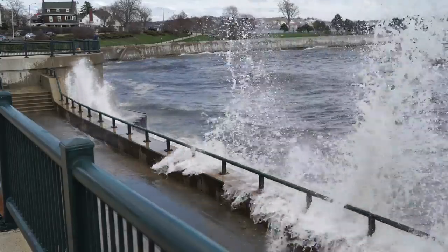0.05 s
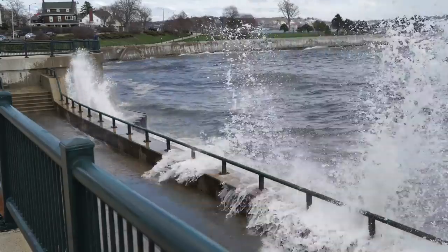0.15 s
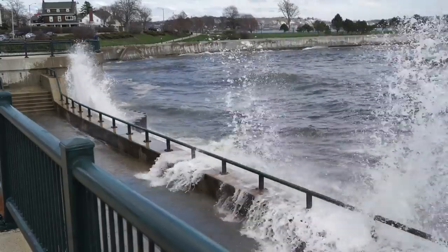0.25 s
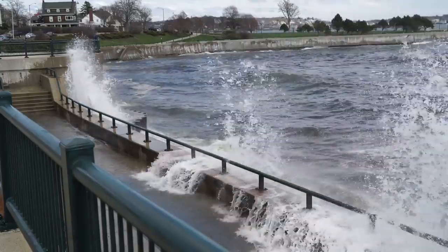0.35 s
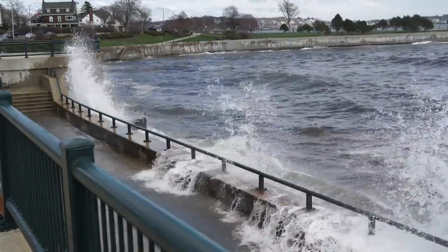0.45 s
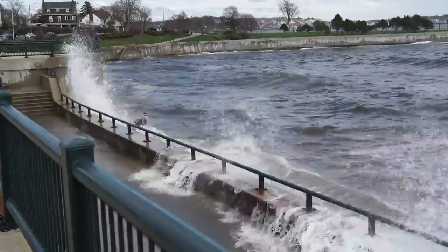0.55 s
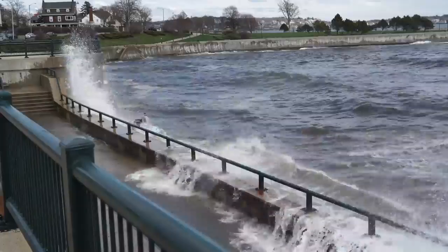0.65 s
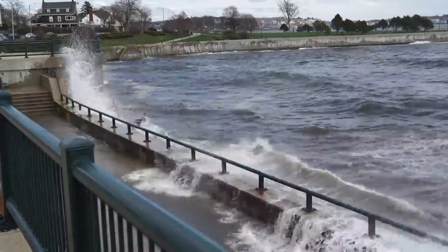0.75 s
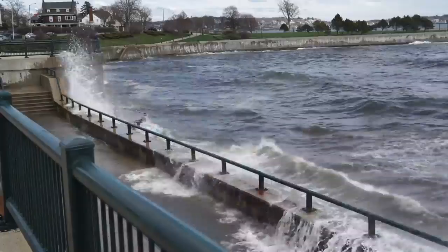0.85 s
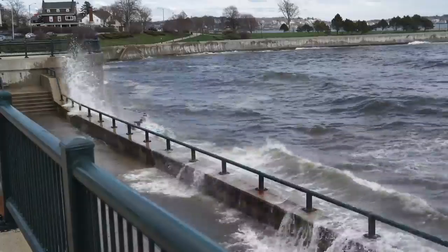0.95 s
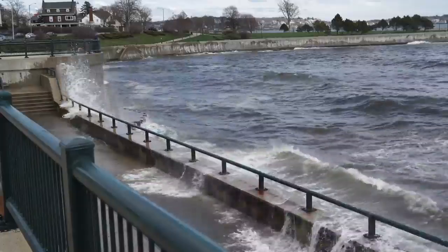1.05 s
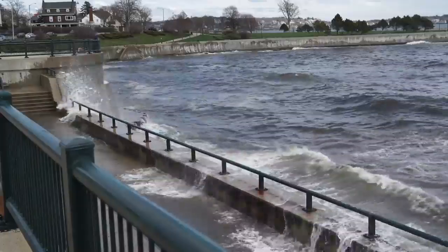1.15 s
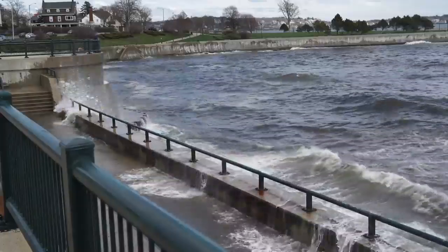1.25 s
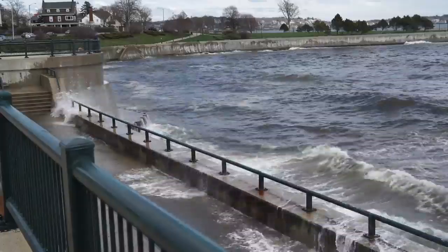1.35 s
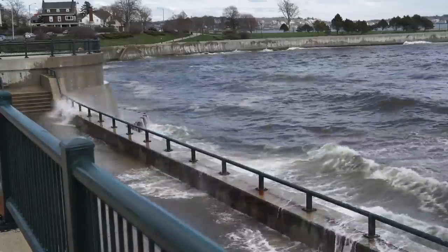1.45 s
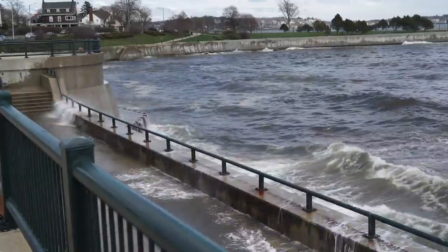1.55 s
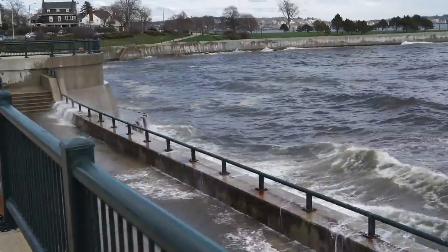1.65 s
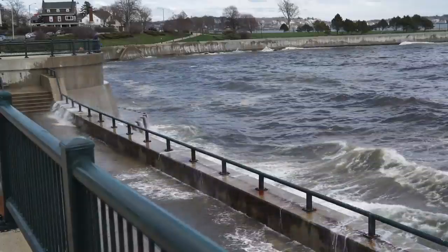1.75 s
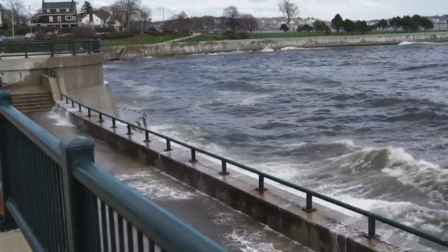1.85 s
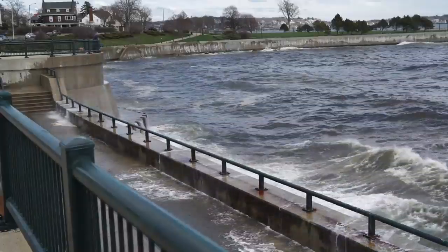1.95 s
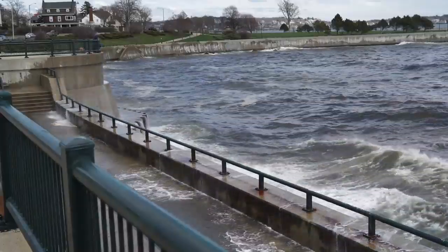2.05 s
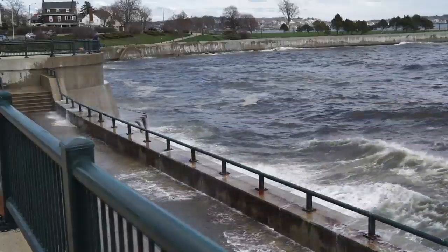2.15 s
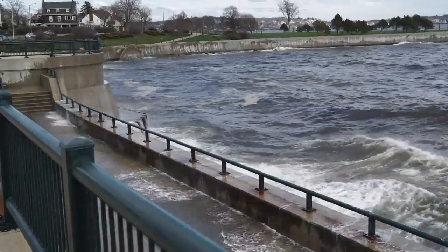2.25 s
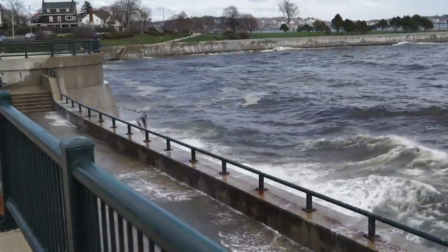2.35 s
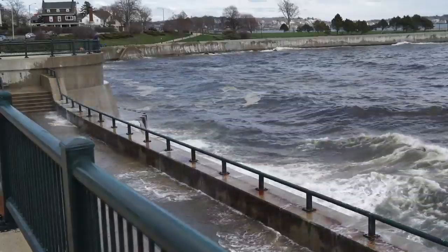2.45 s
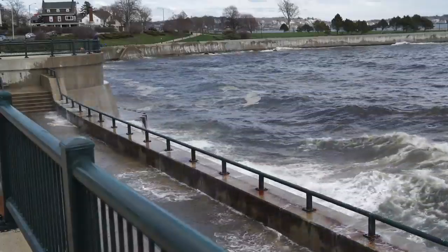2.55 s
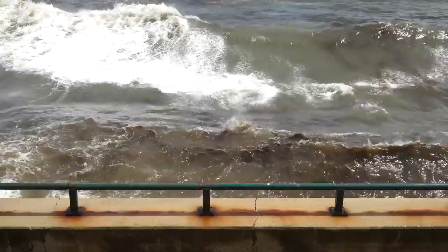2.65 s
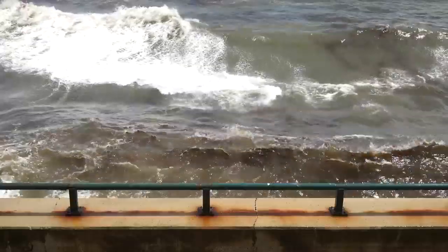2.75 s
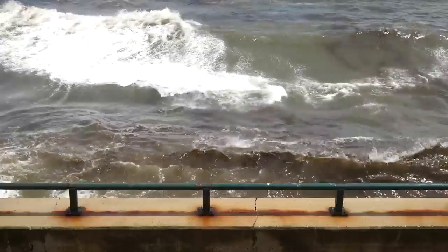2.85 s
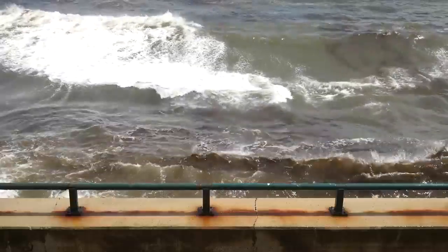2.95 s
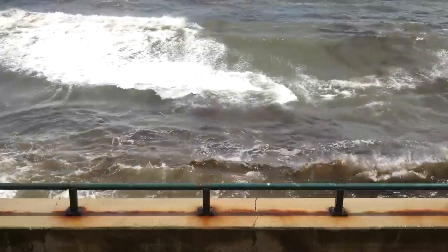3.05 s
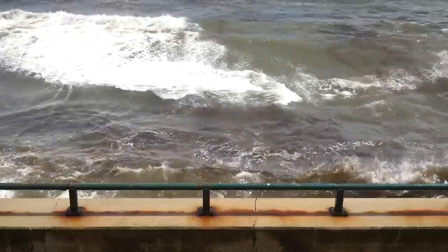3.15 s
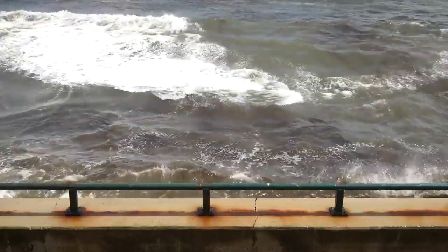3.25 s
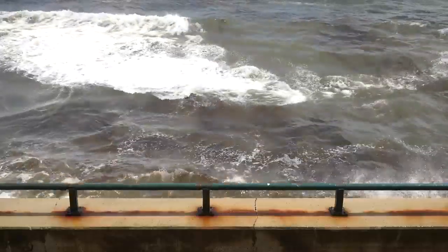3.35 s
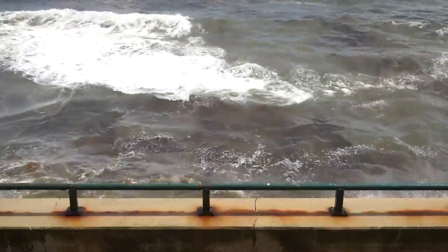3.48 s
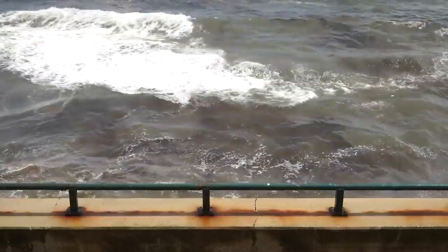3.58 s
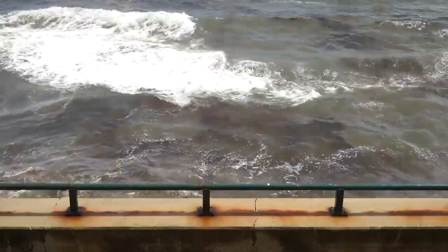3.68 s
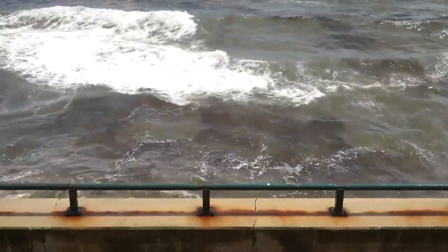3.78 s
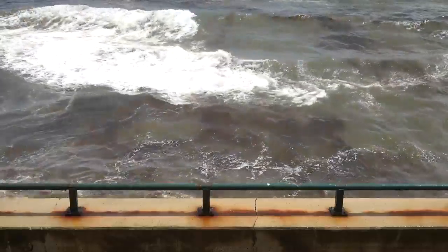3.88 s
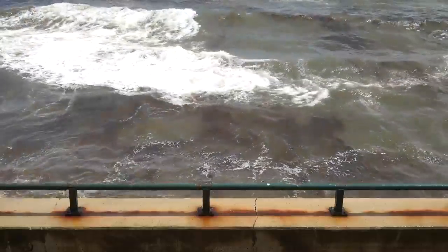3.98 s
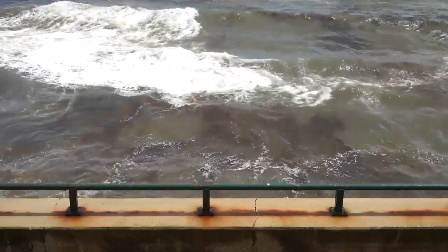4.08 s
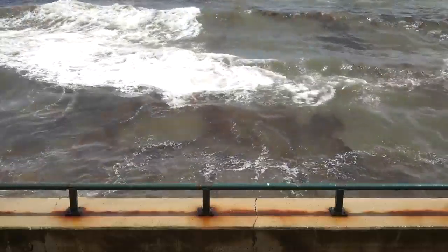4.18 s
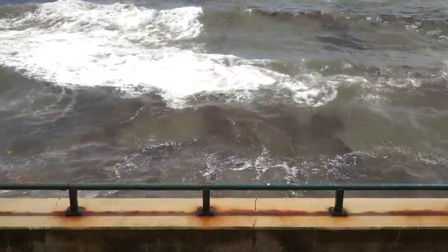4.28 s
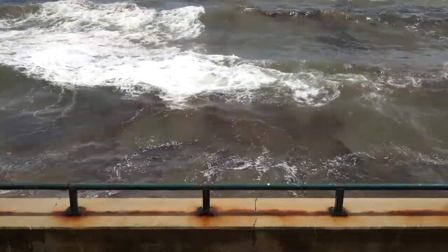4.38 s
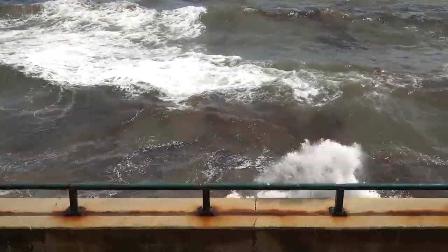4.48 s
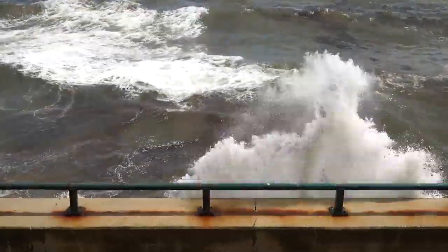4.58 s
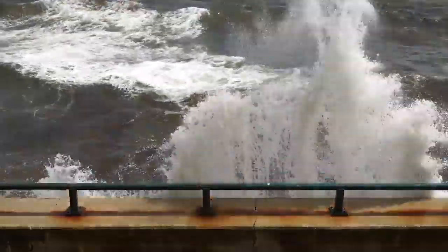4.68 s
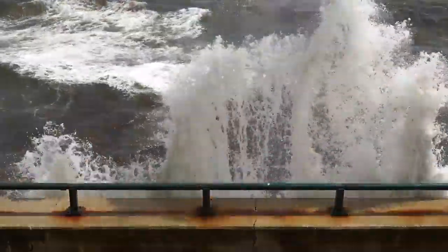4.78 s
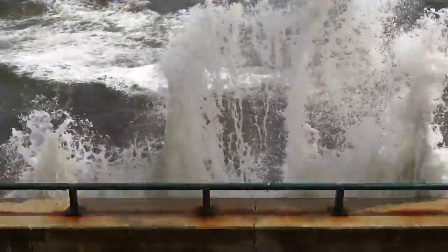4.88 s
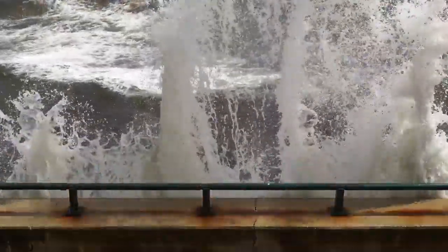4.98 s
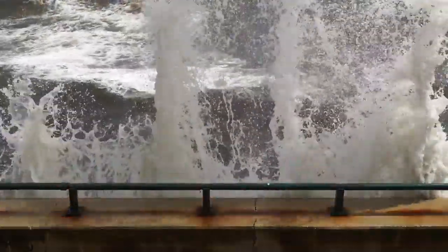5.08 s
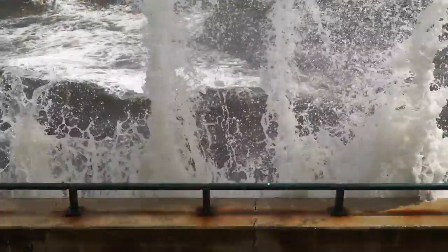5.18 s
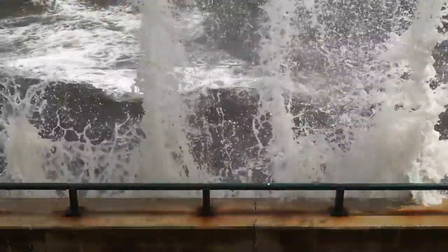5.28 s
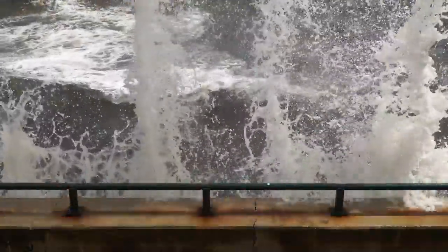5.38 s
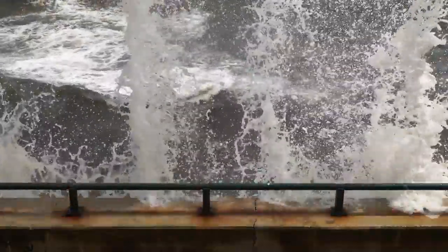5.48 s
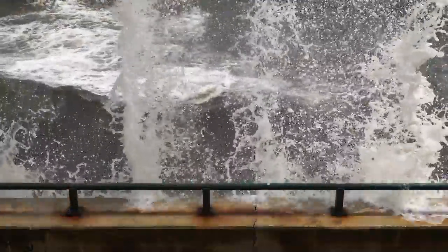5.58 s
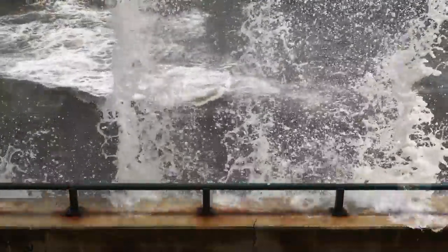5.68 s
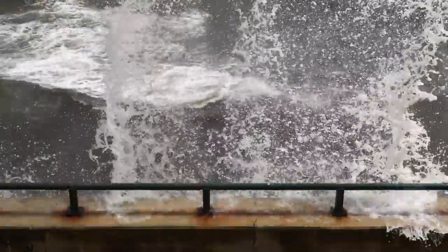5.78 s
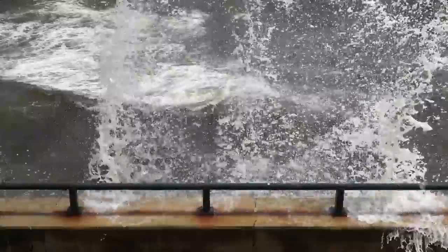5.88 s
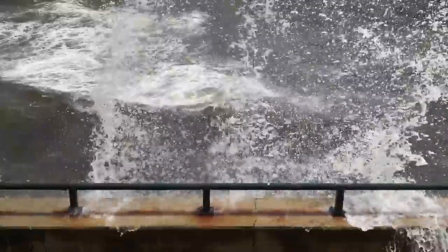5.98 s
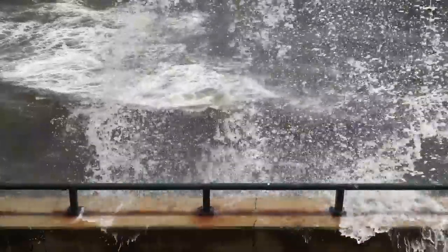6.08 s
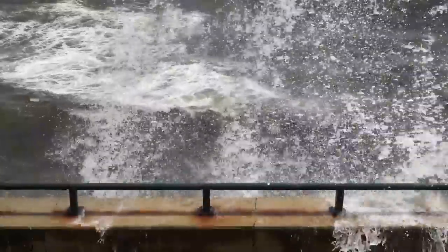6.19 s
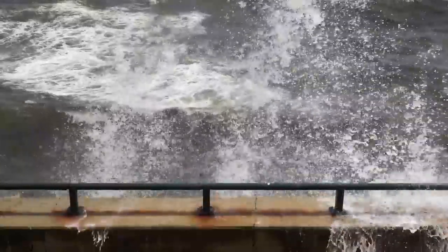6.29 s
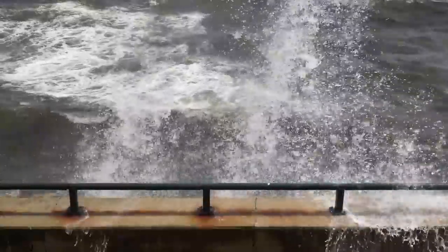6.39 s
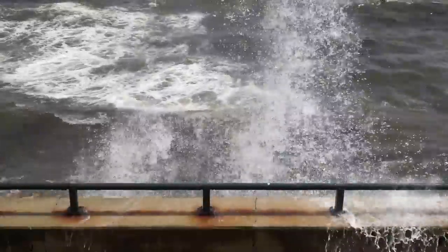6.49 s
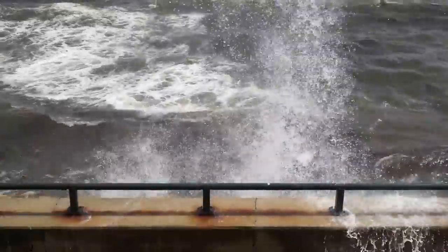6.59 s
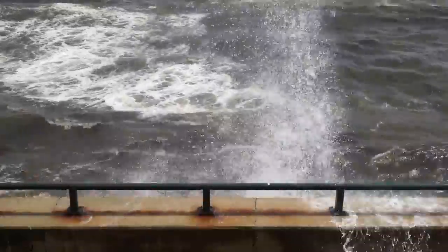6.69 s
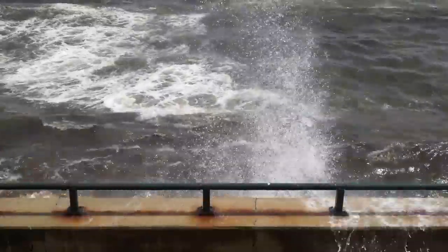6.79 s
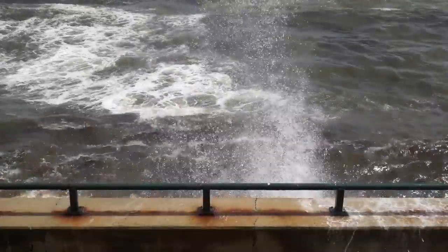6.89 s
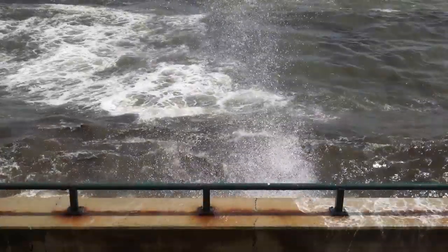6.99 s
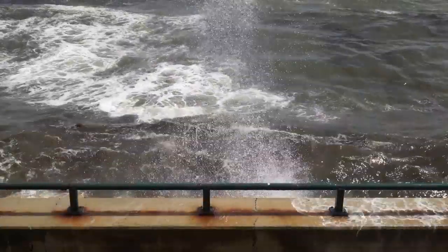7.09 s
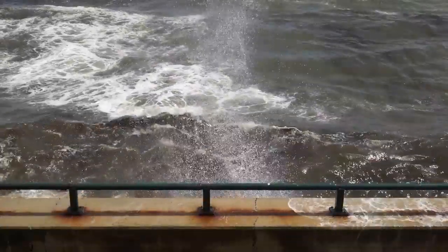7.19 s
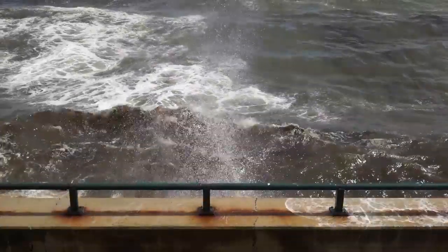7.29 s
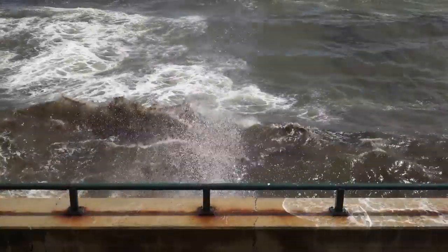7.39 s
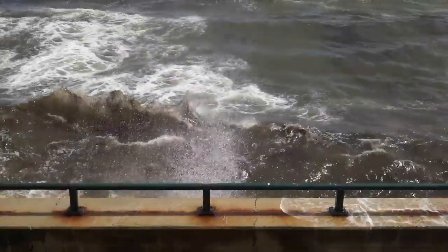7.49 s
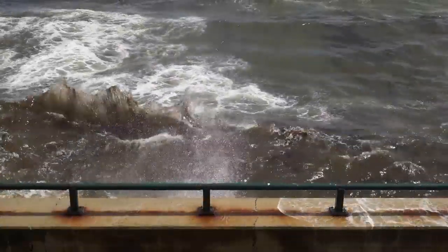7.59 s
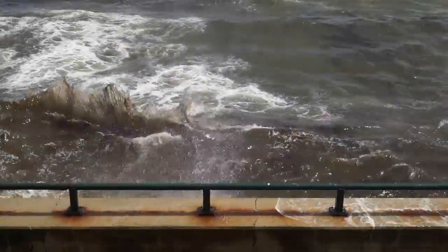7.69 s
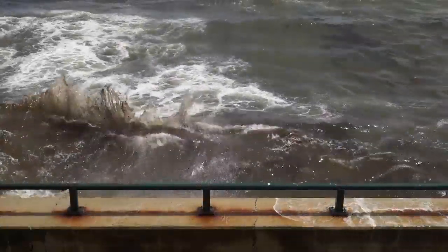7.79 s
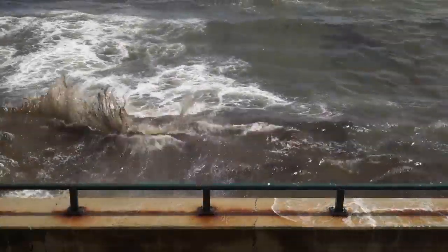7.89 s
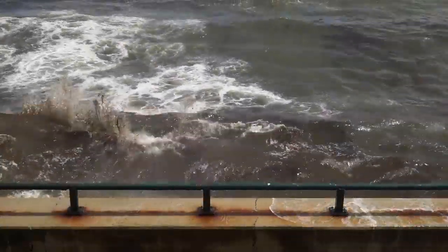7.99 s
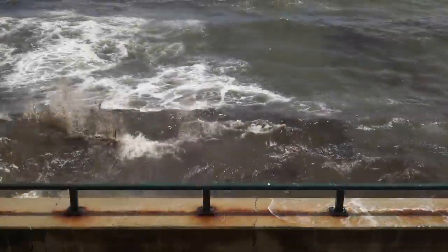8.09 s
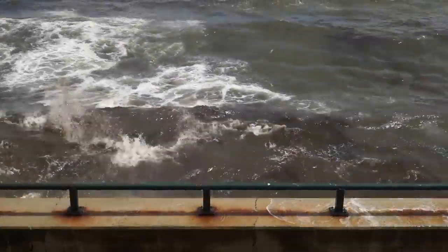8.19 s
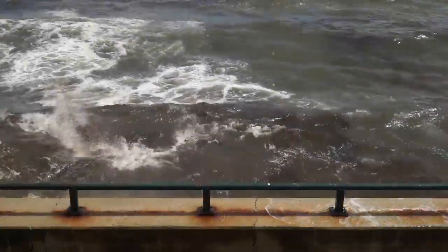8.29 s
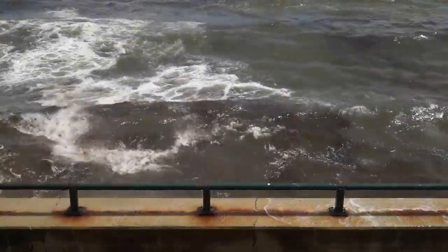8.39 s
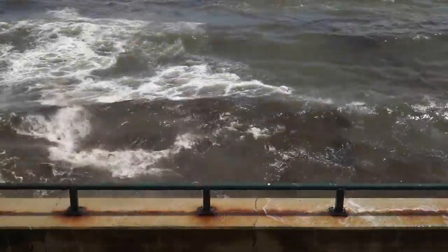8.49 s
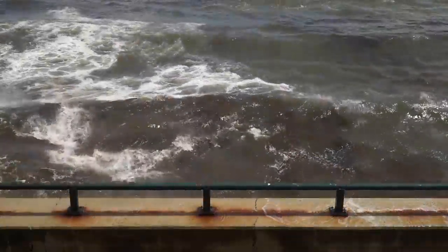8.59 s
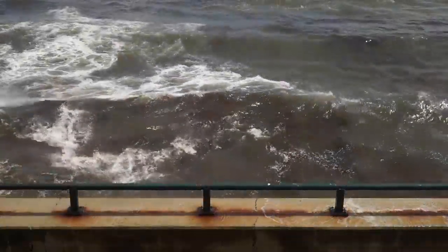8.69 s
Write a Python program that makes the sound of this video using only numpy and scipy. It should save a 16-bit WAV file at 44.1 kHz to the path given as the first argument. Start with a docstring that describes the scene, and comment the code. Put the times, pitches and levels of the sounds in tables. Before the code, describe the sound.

Storm waves churn and thud against a concrete seawall, spray raining back down while strong wind buffets the microphone.

```python
"""Storm waves at a seawall

Heard from two places in turn: along the concrete wall, then facing the sea. Waves rumble, churn with
large bubbles, slap the wall, and throw up spray that rains back on the concrete and drains away.
Wind buffets the microphone, which is mono and has a presence peak near 3 kHz."""
import sys
import numpy as np
from scipy import signal
from scipy.fft import rfft, irfft, next_fast_len
from scipy.io import wavfile
from scipy.ndimage import uniform_filter1d, map_coordinates

SR = 44100
rng = np.random.default_rng(int(sys.argv[2]) if len(sys.argv) > 2 else 0)


def put_to_file(sound):
    """Save the sound as 16-bit audio at rate SR, in the file named by the first command-line argument."""
    columns = np.atleast_2d(sound).T  # one column per channel
    safe = np.clip(columns, -1, 1)
    whole_steps = np.round(safe * 32767)
    wavfile.write(sys.argv[1], SR, whole_steps.astype(np.int16))


N = 385434
TIME_S = np.arange(N) / SR
MOVE_S = 2.735  # listening place changes


def amp(db):
    return 10 ** (np.asarray(db) / 20)


def unit(x):
    return x / np.sqrt(np.mean(x ** 2) + 1e-20)


def filtered(x, gain):
    """x through the frequency response gain(hz)."""
    size = next_fast_len(x.shape[-1] + 8192)
    spectrum = rfft(x, size) * gain(np.fft.rfftfreq(size, 1 / SR))
    return irfft(spectrum, size)[..., :x.shape[-1]]


def coloured(x, spectrum):
    """x shaped by (f/Hz, level/dB) points, -24 dB/octave above the last; rms 1."""
    points_hz, db = np.transpose(spectrum)

    def gain(hz):
        rolloff_db = 24 * np.log2(np.maximum(hz / points_hz[-1], 1))
        return amp(np.interp(np.log(hz + 1), np.log(points_hz), db) - rolloff_db)
    return unit(filtered(x, gain))


def by_place(along, facing):
    """Along the wall until MOVE_S, then facing the sea."""
    return np.where(TIME_S < MOVE_S, along, facing)


def curves(rows):
    """Each column after the time, interpolated per sample."""
    s, *columns = np.transpose(rows)
    return np.array([np.interp(TIME_S, s, column) for column in columns])


def patchy(patch_db):
    """White noise whose level drifts in time-frequency patches."""
    bins = signal.stft(rng.standard_normal(N), nperseg=512)[2]
    field = uniform_filter1d(rng.standard_normal(bins.shape), size=7, axis=0)
    field = unit(uniform_filter1d(field, size=9, axis=1))
    return unit(signal.istft(bins * amp(patch_db * field), nperseg=512)[1][:N])


def grains(count, low_hz, high_hz, cycles, spread_db, rise, samples):
    """Damped sines at random times, mostly weak; a bubble's pitch rises as it nears the surface."""
    when, pitch, strength, sign = rng.random((count, 4)).T
    hz = low_hz + (high_hz - low_hz) * pitch
    age = hz[:, None] * np.arange(samples) / SR / cycles
    gain = np.sign(sign - .5) * amp(-spread_db * np.log(1 - .99 * strength))
    phase = 2 * np.pi * cycles * age * (1 + rise * age / 2)
    rings = gain[:, None] * np.sin(phase) * np.exp(-np.pi * age)
    index = (when * N).astype(int)[:, None] + np.arange(samples)
    return unit(np.bincount(index.ravel(), rings.ravel(), N)[:N])


def burst(start_s, db, hz, shape, attack_s, t60_s):
    """Track with one decaying noise puff; shape lists (multiple of hz, level/dB)."""
    t = TIME_S[:SR // 3]
    noise = coloured(rng.standard_normal(len(t)), [(hz * ratio, level) for ratio, level in shape])
    envelope = amp(db) * (1 - np.exp(-t / attack_s)) * amp(-60 * t / t60_s)
    return np.pad(noise * envelope, (round(start_s * SR), N))[:N]


def turbulence(spectrum, evenness):
    """Low pressure noise, its level partly evened out."""
    pressure = coloured(rng.standard_normal(N), spectrum)
    power = np.abs(uniform_filter1d(uniform_filter1d(pressure ** 2, size=3000), size=2000))
    return unit(pressure / (power + 1e-6) ** (evenness / 2))


def wind_and_rumble():
    """Gusts thump the microphone over a low rumble of surf and wind; a wave booms near 4.45 s."""
    # levels at each place: t/s, wind buffet/dB, surf and wind rumble/dB
    along = [(0, -32, -24.5), (0.35, -35, -29.5), (0.7, -24.5, -27.5), (1.15, -28.5, -25),
             (1.7, -35, -28.5), (2.1, -37, -23), (2.73, -26.5, -29.5)]
    facing = [(2.74, -24, -34.5), (3.25, -19, -28.5), (3.6, -22.5, -39), (4.1, -16.5, -31.5),
              (4.45, -19.5, -23.5), (4.7, -17, -28.5), (4.9, -12, -30), (5.55, -15, -24.5), (5.8, -21, -29),
              (6.15, -21, -26.5), (6.55, -18, -29), (7.05, -12, -33.5), (7.3, -26, -30),
              (7.8, -25.5, -35.5), (8.45, -22, -31), (8.74, -19, -30.5)]
    # single gusts: t/s, level/dB, half length/s
    gusts = [(2.06, -22.5, 0.035), (2.947, -17, 0.021), (3.114, -12.5, .03), (3.317, -13.5, 0.022),
             (3.875, -14, 0.034), (4.21, -19, .03), (4.913, -11.5, 0.063), (5.616, -10.5, 0.045),
             (6.082, -11.5, 0.11), (6.397, -7.5, 0.034), (6.687, -16, .03), (7.43, -16.5, 0.038),
             (7.73, -20, .025), (7.917, -10, 0.027), (8.268, -16.5, 0.038), (8.407, -16, .035),
             (8.73, -13.5, .03)]
    # spectra: f/Hz, level/dB
    buffet_spectrum = [(8, -27), (20, 7.5), (30, -3.5), (52, -1), (75, -8), (110, -21), (200, -55),
                       (500, -78)]
    rumble_spectrum = [(45, -9), (85, 2), (125, 0), (170, -4.5), (240, -13), (400, -24.5), (1500, -55)]
    wander_db, wander_hz = 0.8, 9
    wander = map_coordinates(rng.standard_normal(400), [TIME_S * wander_hz], mode="wrap")
    buffet_gain, rumble_gain = amp(by_place(curves(along), curves(facing)) + wander_db * wander)
    gust_gain = sum(amp(db) * np.exp(-((TIME_S - s) / half_s) ** 2 / 2) for s, db, half_s in gusts)
    buffet = np.hypot(buffet_gain, gust_gain) * turbulence(buffet_spectrum, evenness=0.42)
    return buffet + rumble_gain * turbulence(rumble_spectrum, evenness=0.39)


def surge(peak_s, swell_s, hold_s, fall_db_per_s):
    """Gain that swells to 1, holds and dies; heard only at its own place."""
    rise = np.sin(np.pi / 2 * np.clip(1 + (TIME_S - peak_s) / swell_s, 0, 1)) ** 2
    fall = amp(-fall_db_per_s * np.maximum(TIME_S - peak_s - hold_s, 0))
    return rise * fall * by_place(peak_s < MOVE_S, peak_s >= MOVE_S)


def sea_gains():
    """Churn, splash, spray and mist gains: surges of water add power to the restless sea."""
    # sea between waves, along then facing: churn/dB, splash/dB, spray/dB, mist/dB
    sea_bed = [(-27, -37, -47, -54.5), (-38, -46.5, -54, -73)]
    # breaking waves, and run-off draining at 7-8 s: peak t/s, level/dB, swell/s, hold/s
    churn_surges = [(0.011, -18.5, .04, 0.18), (0.6, -21.5, 0.32, 0.41), (2.55, -35, 0.5, 0.11),
                    (3.04, -35.5, 0.29, 0.038), (4.462, -34, 0.64, 0.11), (5.59, -33, 0.29, 1),
                    (7.394, -36, 1, 0.73), (8.512, -28, 0.59, .25)]
    # falling spray, and run-off draining at 7-8 s:
    # peak t/s, splash/dB, swell/s, hold/s, fall/(dB/s), spray re splash/dB, mist re spray/dB
    splash_surges = [(0.008, -20.5, 0.059, 0.37, 30, -7.5, -10.5), (0.744, -21, 0.92, 0.15, 19, -3.5, -14),
                     (3.022, -40, 0.55, 0.16, 40, -15.5, -19), (4.78, -49, 0.34, 0.21, 10, -1, -5.5),
                     (5.757, -34, 0.59, 0.47, 30, -6, -9.5), (6.45, -33, 0.37, 0.17, 36, -0.5, -11),
                     (7.2, -44, 1, 1, 18, -3.5, -11), (8.713, -33.5, 0.79, 0.11, 20, -4, -14)]
    fizz_db = -20  # spray re churn
    bed_power = [by_place(*amp(pair)) ** 2 for pair in np.transpose(sea_bed)]
    churn_power, splash_power, spray_power, mist_power = bed_power
    for s, db, swell_s, hold_s in churn_surges:
        water = amp(db) * surge(s, swell_s, hold_s, fall_db_per_s=20.5)
        churn_power += water ** 2
        spray_power += (water * amp(fizz_db)) ** 2
    for s, db, swell_s, hold_s, fall_db_per_s, spray_db, mist_db in splash_surges:
        water = amp(db) * surge(s, swell_s, hold_s, fall_db_per_s)
        splash_power += water ** 2
        spray_power += (water * amp(spray_db)) ** 2
        mist_power += (water * amp(spray_db + mist_db)) ** 2
    return np.sqrt([churn_power, splash_power, spray_power, mist_power])


def churn():
    """Air pockets gurgle in the water; large bubbles ring low and long."""
    # churn spectrum at each place: f/Hz, level/dB
    along = [(90, -11), (180, -2), (250, -0.5), (350, 0), (460, -0.5), (540, -1.5), (750, -3), (950, -2.5),
             (1350, -6), (2200, -12.5), (5000, -46)]
    facing = [(100, -25), (200, -4), (290, -0.5), (370, 1), (490, 0), (620, -3), (850, -3), (1300, -7.5),
              (2200, -12.5), (5000, -29)]
    bubbles = grains(3600, low_hz=180, high_hz=1486, cycles=4.1, spread_db=1.5, rise=0.11, samples=1300)
    foam = patchy(patch_db=0.87) + amp(-12.5) * bubbles
    return by_place(coloured(foam, along), coloured(foam, facing))


def splash():
    """Sheets of water splash down."""
    # splash spectrum: f/Hz, level/dB
    spectrum = [(300, 1.5), (800, -2), (1400, -3), (2000, -0.5), (2700, 1.5), (3500, 0), (4200, -3),
                (5200, -6), (6500, -8.5), (12000, -25.5)]
    splatter = grains(18000, low_hz=935, high_hz=5720, cycles=2.56, spread_db=2.5, rise=0.12,
                      samples=130)
    return coloured(patchy(patch_db=1.33) + amp(-8.5) * splatter, spectrum)


def spray():
    """Fine spray patters; small droplets only tick."""
    # spray spectrum: f/Hz, level/dB
    spectrum = [(2000, -9), (4500, 2.5), (6200, -2), (8400, -1.5), (10000, -4.5), (12800, -10),
                (15000, -15), (15700, -19)]
    droplets = grains(14000, low_hz=4000, high_hz=14000, cycles=0.53, spread_db=5, rise=0, samples=32)
    return coloured(patchy(patch_db=1.6) + amp(-6) * droplets, spectrum)


def mist():
    """The airborne plume's finest mist hisses highest."""
    # mist spectrum: f/Hz, level/dB
    spectrum = [(6000, -29), (10000, -3), (12800, 1), (15700, -4)]
    return coloured(patchy(patch_db=0.5), spectrum)


def slaps():
    """Waves trap air against the wall and thud."""
    # wall hits: t/s, level/dB, attack/s, t60/s, air pocket f/Hz
    hits = [(3.0985, -13.5, 0.0007, 0.041, 417), (4.438, -14.5, .004, 0.2, 188),
            (4.446, -22.5, .002, .09, 557), (4.572, -27, .008, 0.28, 600), (4.64, -23.5, 0.013, 0.52, 355),
            (6.311, -24, .01, 0.15, 332), (8.372, -19.5, .0036, 0.12, 330), (8.503, -18, .006, .11, 280)]
    # slap spectrum: multiple of pocket pitch, level/dB
    shape = [(.25, -16), (.6, 10.5), (1, 7.5), (1.4, 1), (2.5, -5), (7, -43), (20, -60)]
    return sum(burst(s, db, hz, shape, attack_s, t60_s) for s, db, attack_s, t60_s, hz in hits)


def smacks():
    """Lumps of water smack the concrete; bigger ones sound lower and take longer to land."""
    # landings: t/s, level/dB, f/Hz, t60/s
    lumps = [(5.6, -34, 1290, 0.19), (5.725, -26, 2780, 0.066), (5.776, -27, 1300, 0.37),
             (5.95, -24.5, 1270, 0.31), (5.9804, -25, 1700, .04), (6.369, -27, 2600, 0.036),
             (6.43, -22, 2550, 0.054), (6.4948, -17.5, 2300, 0.027), (6.566, -26, 2600, .05),
             (6.84, -29, 2400, 0.037)]
    # smack spectrum: multiple of pitch, level/dB
    shape = [(.25, -15), (.6, -1), (1, 10), (1.4, 1.5), (2, -4.5), (4, -9.5), (7, -14)]
    return sum(burst(s, db, hz, shape, attack_s=0.022 * t60_s, t60_s=t60_s)
               for s, db, hz, t60_s in lumps)


def drops():
    """Heavy drops land close by with sharp ticks."""
    # landings: t/s, level/dB, f/Hz
    landings = [(5.768, -29, 12500), (5.8632, -21.5, 13000), (5.9815, -23, 7000), (6.044, -27, 6200),
                (6.1296, -27, 8200), (6.1815, -23.5, 7000), (6.192, -30, 12100), (6.287, -20.5, 5400),
                (6.3935, -28, 6000), (6.7881, -28, 8000)]
    shape = [(0.25, -30), (1, 0), (2, -12)]  # multiple of pitch, level/dB
    return sum(burst(s, db, hz, shape, attack_s=0.0002, t60_s=0.008) for s, db, hz in landings)


def scene():
    """Wind, surf and impacts, alike in both channels."""
    churn_gain, splash_gain, spray_gain, mist_gain = sea_gains()
    mono = wind_and_rumble()
    mono += churn_gain * churn() + splash_gain * splash() + spray_gain * spray() + mist_gain * mist()
    mono += slaps() + smacks() + drops()
    return np.array([mono, mono])


def record(dry):
    """The microphone port rings, the loudest gusts are rounded off, the band is limited."""
    port_hz, half_width_hz, port_db = 3220, 380, 6.5
    ceiling, top_hz = 0.75, 15700
    peaked = filtered(dry, lambda hz: amp(port_db / (1 + ((hz - port_hz) / half_width_hz) ** 2)))
    rounded = peaked / (1 + np.abs(peaked / ceiling) ** 8) ** (1 / 8)
    return filtered(rounded, lambda hz: hz < top_hz)


dry = scene()
out = record(dry)
put_to_file(out)
```